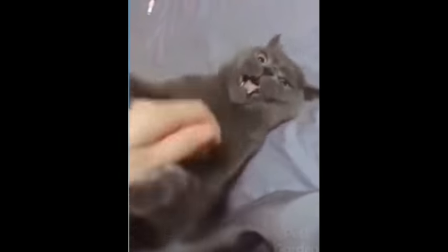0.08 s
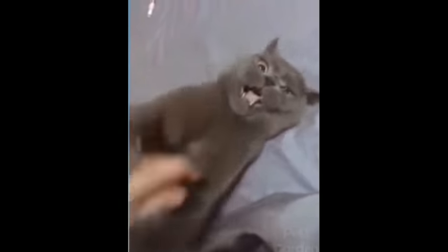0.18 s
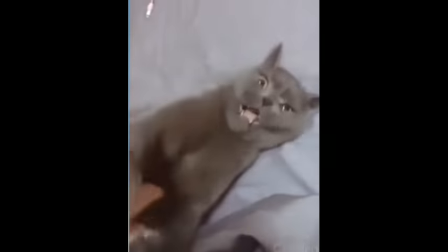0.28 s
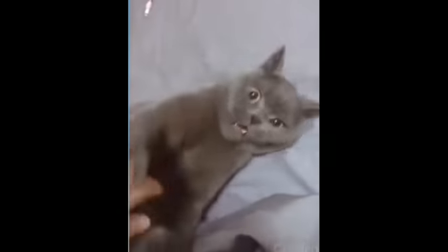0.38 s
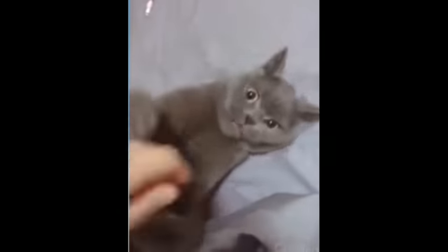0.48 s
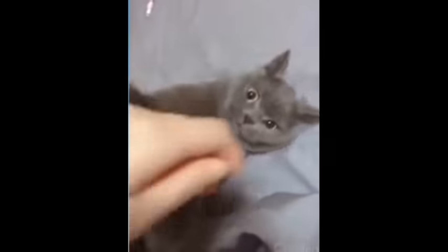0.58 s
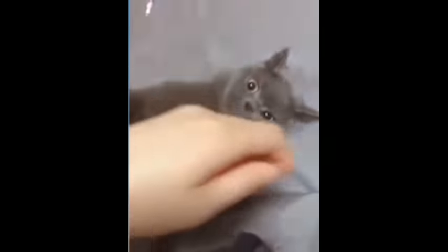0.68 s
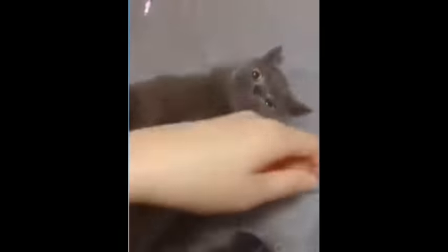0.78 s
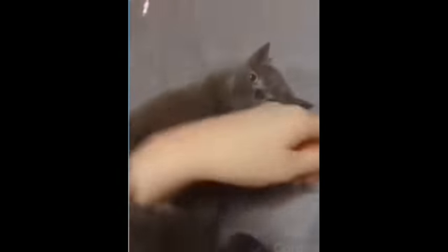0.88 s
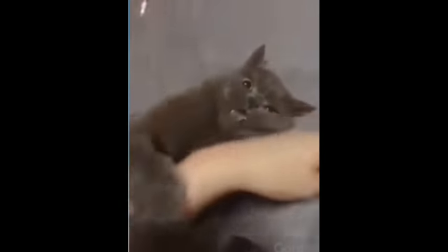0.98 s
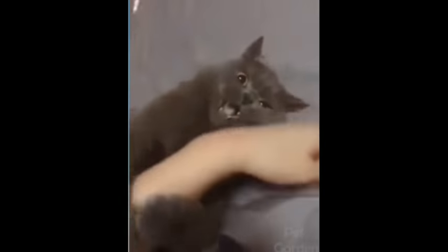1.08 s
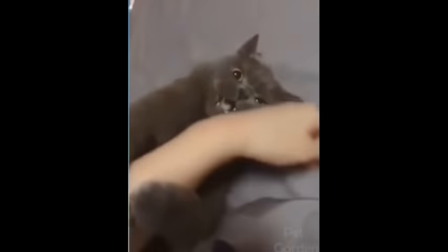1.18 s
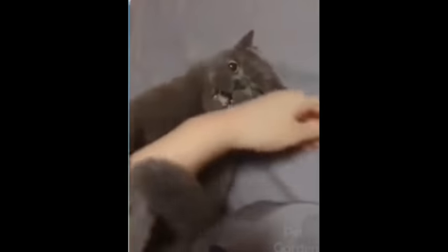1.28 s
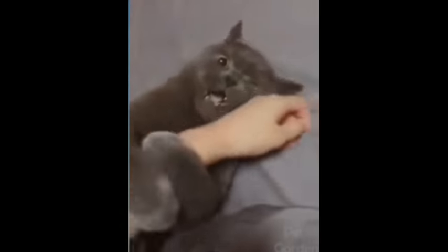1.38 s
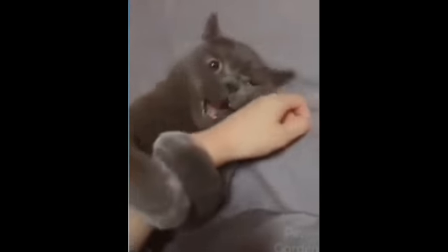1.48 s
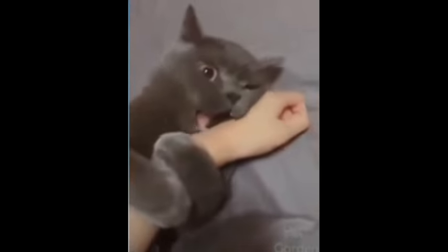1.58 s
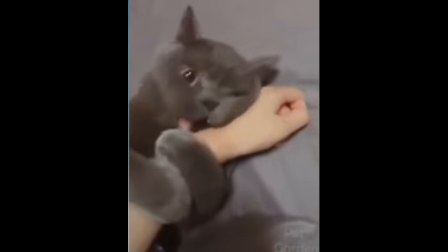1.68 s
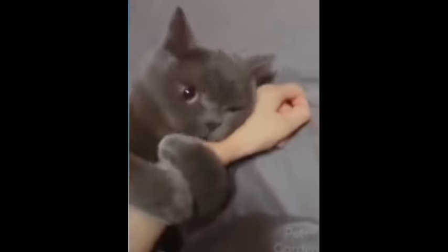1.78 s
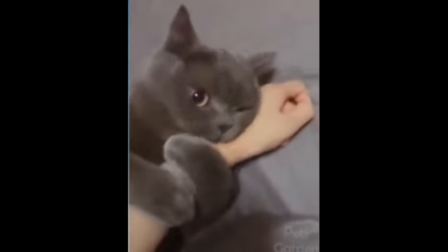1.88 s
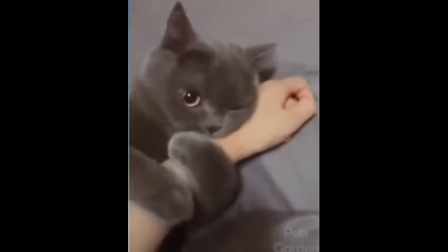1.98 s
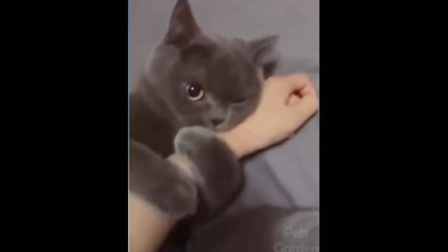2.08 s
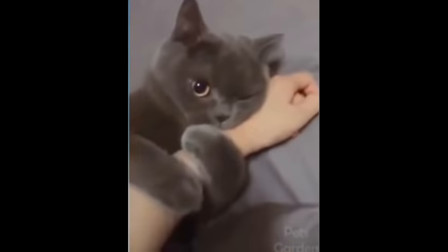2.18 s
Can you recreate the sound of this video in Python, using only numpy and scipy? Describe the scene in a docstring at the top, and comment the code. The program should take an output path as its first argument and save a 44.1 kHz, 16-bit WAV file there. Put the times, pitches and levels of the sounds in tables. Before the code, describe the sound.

A cat yowls close to the microphone in a small room: two sharp rising yelps, a sinking closed-mouth moan, then a rasping meow that stops. Soft bedding rustles and a faint low hum lie underneath.

```python
"""One long complaining yowl, close to the microphone: a cat wrestling with an arm on a bed.
It rises to two sharp yelps, sinks to a closed-mouth moan, then opens again in a rasping meow.
The voice is a stack of harmonics plus pulsed noise, shaped by moving throat, mouth and nose resonances.
Bedding rustles in swells of coloured noise; a small room answers with reflections and a short tail.
Underneath, a few wavering sines hum over steady noise."""
import sys
import numpy as np
from scipy import signal
from scipy.fft import rfft, irfft, next_fast_len
from scipy.io import wavfile
from scipy.ndimage import uniform_filter1d, map_coordinates

SR = 44100
rng = np.random.default_rng(int(sys.argv[2]) if len(sys.argv) > 2 else 0)


def to_wav(s):
    """Save 16-bit WAV."""
    ch = np.atleast_2d(s).T  # columns
    pcm = np.round(np.clip(ch, -1, 1) * 32767)  # PCM
    wavfile.write(sys.argv[1], SR, pcm.astype(np.int16))


N = 97020
TOP_HZ = 14000  # upper band limit of the voice's harmonics and of the recorder


def amp(db):
    """Amplitude factor of a level in dB."""
    return 10 ** (np.asarray(db) / 20)


def unit(x):
    """x scaled to rms 1."""
    return x / np.sqrt(np.mean(x ** 2) + 1e-20)


def along(points, hz):
    """Spectral shape from (Hz, value) points, read on a log frequency axis."""
    f, v = np.transpose(points)
    return np.interp(np.log(hz + 1), np.log(f + 1), v)


def curve(rows, t):
    """Each column after the time, read at the times t."""
    s, *cols = np.transpose(rows)
    return np.squeeze([np.interp(t, s, c) for c in cols])


def wobble(rate, t):
    """A smooth random curve, rate knots a second."""
    return map_coordinates(rng.standard_normal(4096), [t * rate], mode="wrap")


def filtered(x, response):
    """x shaped by a gain that depends on frequency."""
    m = next_fast_len(N + 8192)
    freqs = np.fft.rfftfreq(m, 1 / SR)
    return irfft(rfft(x, m) * response(freqs), m)[:N]


def noise(spectrum):
    """Coloured noise of rms 1."""
    return unit(filtered(rng.standard_normal(N), lambda hz: amp(along(spectrum, hz))))


def cat(count=30):
    """Vocal folds with slight jitter, and turbulence pulsed once a cycle, through the same resonances."""
    # pitch of the voice: t/s, f/Hz
    pitch_line = [(0, 627.4), (.05, 648), (.104, 667), (.15, 608.7), (.18, 632), (.203, 698), (.222, 707),
                  (.236, 662.4), (.264, 652.4), (.298, 681), (.34, 698), (.368, 713), (.413, 702.7),
                  (.44, 733.1), (.478, 776), (.545, 768), (.6, 706), (.662, 640.6), (.728, 562.5),
                  (.804, 530), (.852, 447.2), (.894, 418.4), (.942, 391.7), (.984, 375.3), (1.04, 368.4),
                  (1.085, 373.2), (1.12, 397.6), (1.16, 383.4), (1.205, 391), (1.23, 428.1), (1.25, 458.1),
                  (1.278, 484), (1.306, 530), (1.334, 640.7), (1.35, 618.4), (1.382, 592.7), (1.458, 581),
                  (1.51, 611), (1.556, 644.3), (1.6, 598), (1.656, 504.5), (1.672, 510), (1.7, 603.5)]
    # roughness, drives both jitter and rasp: t/s, amount/0-1
    roughness = [(0, .1), (.23, .04), (.29, .015), (.32, .02), (.345, .16), (.385, .06), (.415, .015),
                 (.455, .08), (.49, .035), (.56, .03), (.68, .05), (.85, .08), (.93, .15), (1.18, .13),
                 (1.26, .13), (1.295, .2), (1.315, .28), (1.328, .42), (1.345, .15), (1.45, .07),
                 (1.57, .07), (1.66, .2)]
    # drive of the nasal tone, added to the nose shape: t/s, drive/dB
    nasal_drive = [(0, -9.5), (.21, -9.5), (.25, 4), (.31, 0), (.35, -17), (.42, 2), (.55, 5), (.66, -12.5),
                   (.73, 2), (.8, 0.5), (.87, -3), (1, -8), (1.2, -7), (1.26, -16), (1.31, -13),
                   (1.35, -6.5), (1.4, -14), (1.61, -12.5), (1.63, -3.5), (1.678, -9), (1.7, -60)]
    # nose resonance before the drive: f/Hz, level/dB
    nose_shape = [(300, -14), (380, -26), (440, -27), (530, -37), (600, -40.5), (680, -43), (790, -52.5),
                  (1000, -36.5), (2000, -100)]
    base_jitter, flutter_db, rasp_db = 0.004, 1.3, 4  # roughness scales jitter and rasp
    quiver_s, quiver_length_s, quiver_rate_hz, quiver_depth = 1.04, .16, 42, .018  # during the moan
    wander_rad_per_harmonic, wander_rate = .075, 70  # rate in knots a second
    hop = 64  # samples between frames

    t = np.arange(N) / SR
    hz, frames, z = signal.stft(rng.standard_normal(N), SR, nperseg=8 * hop, noverlap=7 * hop)
    rough = np.clip(curve(roughness, t), 0, 1)

    quiver_swell = np.exp(-((t - quiver_s) / quiver_length_s) ** 4)
    quiver = quiver_swell * np.sin(2 * np.pi * quiver_rate_hz * t + wobble(20, t))
    jitter = base_jitter * (.5 + 7 * rough) * wobble(170, t)
    pitch = curve(pitch_line, t) * (1 + jitter + quiver_depth * quiver)
    phase = 2 * np.pi * np.cumsum(pitch) / SR

    f0 = curve(pitch_line, frames)
    harmonics = np.arange(1, count + 1)[:, None] * f0
    nose = amp(along(nose_shape, harmonics) + curve(nasal_drive, frames))
    gains = np.hypot(tract(harmonics, frames, harmonics), nose)
    shifts = uniform_filter1d(resonance_phase(gains), size=15, axis=1)
    # higher harmonics drift further out of step
    shifts = shifts + [k * wander_rad_per_harmonic * wobble(wander_rate, frames) for k in range(count)]

    tone = np.zeros(N)
    audible = gains * (harmonics < TOP_HZ)
    for k, (gain, shift) in enumerate(zip(audible, shifts), 1):
        level = np.interp(t, frames, gain * amp(flutter_db * wobble(60.35, frames)))
        tone += level * np.cos(k * phase + np.interp(t, frames, shift))

    # each harmonic's level spreads over a band one f0 wide
    turbulence = z * tract(hz[:, None], frames, harmonics) * np.sqrt(SR / 2 / f0)
    rasp = signal.istft(turbulence, nperseg=8 * hop, noverlap=7 * hop)[1][:N]
    pulses = unit(1 + .8 * np.cos(phase))
    voice = np.sqrt(2) * tone + amp(rasp_db) * rough * rasp * pulses
    return voice * np.clip((pitch_line[-1][0] - t) / .02 + 1, 0, 1)  # 20 ms fade at the end


def tract(hz, t, harmonics):
    """Gain of throat, mouth and upper resonance; each shares its level among the harmonics in it."""
    # throat resonance, before the notch: t/s, level/dB
    throat_level = [(0, -54), (.022, -43.5), (.11, -40.5), (.16, -31), (.21, -42.5), (.24, -27),
                    (.275, -31.5), (.35, -43.5), (.42, -32), (.52, -40), (.66, -39), (.8, -50), (.87, -45),
                    (.93, -38.5), (1.05, -36.5), (1.17, -44), (1.24, -40.5), (1.3, -35), (1.45, -34),
                    (1.56, -32), (1.66, -44.5), (1.685, -44), (1.71, -78)]
    # open mouth, before the notch: t/s, level/dB
    mouth_level = [(0, -49), (.13, -63), (.155, -34.5), (.2, -51), (.23, -37), (.252, -26.5), (.268, -17.5),
                   (.283, -15.5), (.298, -16.5), (.313, -20), (.335, -33.5), (.388, -33.5), (.402, -16),
                   (.43, -15), (.46, -23), (.55, -26), (.66, -34.5), (.7, -47.5), (.77, -58.5),
                   (.83, -48.5), (.92, -44.5), (1, -49.5), (1.205, -48), (1.23, -34.5), (1.246, -37),
                   (1.265, -23), (1.355, -24), (1.4, -31), (1.45, -42.5), (1.5, -42), (1.555, -26.5),
                   (1.61, -42.5), (1.66, -61), (1.71, -56)]
    # upper resonance, before the notch: t/s, level/dB, centre f/Hz, half-width/Hz
    treble = [(0, -71, 5300, 900), (.13, -65.5, 5460, 700), (.156, -44.5, 5730, 480),
              (.19, -58.5, 5720, 450), (.225, -50.5, 5980, 455), (.245, -39.5, 3840, 1000),
              (.285, -30.5, 3700, 850), (.34, -58, 4520, 800), (.385, -58, 4170, 1000),
              (.41, -32, 4000, 1000), (.435, -22.5, 3950, 1040), (.472, -23.5, 4200, 1000),
              (.51, -36.5, 4940, 1012), (.56, -34.5, 5160, 800), (.595, -38.5, 5370, 480),
              (.635, -38, 5480, 332), (.668, -41.5, 5540, 380), (.692, -54, 5560, 300),
              (.71, -89, 5400, 600), (.82, -91, 3600, 400), (.92, -61, 3436, 347.2), (1.07, -62, 3431, 350),
              (1.2, -76, 3700, 600), (1.25, -54.5, 4270, 890), (1.305, -33, 4380, 850),
              (1.35, -35.5, 4832, 550), (1.39, -49, 4520, 551), (1.44, -62, 4598, 800),
              (1.51, -70, 4400, 800.6), (1.555, -55, 4410, 450.3), (1.62, -80, 4400, 900),
              (1.71, -87, 4400, 900)]
    # sharp resonance in the mouth, negative lift dips: t/s, lift/dB, centre f/Hz
    sharp_focus = [(0, 4, 1950), (.16, -1.5, 1850), (.21, -5, 2100), (.25, 5.5, 2020), (.29, 9, 2020),
                   (.35, -4.5, 2050), (.42, 14, 2040), (.5, 4.5, 2270), (.56, 0, 2233), (.66, 3, 1990),
                   (1.05, 10, 1850), (1.23, 18.5, 2170), (1.28, -1, 2410), (1.31, 7, 2120),
                   (1.35, -3.5, 2008), (1.45, -5, 1870), (1.55, 9.5, 1900), (1.65, 16, 1907)]
    # moving anti-resonance, above the upper resonance in the yelps, mostly below it elsewhere;
    # negative depth lifts: t/s, f/Hz, depth/dB
    notch_path = [(0, 4400, -2), (.16, 4720, 0.5), (.245, 4500, 24), (.28, 4970, 26), (.32, 5400, 6),
                  (.375, 4384, 10), (.41, 4200, 10), (.437, 4320, 19), (.47, 4030, 7), (.51, 3700, 0),
                  (.56, 3487, -4), (.63, 3400, 8), (.67, 3170, 9), (.8, 3300, -3), (1.25, 3503, 3),
                  (1.3, 3500, -4), (1.35, 3546, 3), (1.39, 3560, 23), (1.55, 3520, 28), (1.7, 3337, 6)]
    # relative colour of throat, mouth and top end: f/Hz, level/dB
    throat_shape = [(400, -49), (750, -28), (900, -15.5), (1170, -3.5), (1500, -10.5), (1750, -12.5),
                    (2200, -42), (4000, -54.5)]
    mouth_shape = [(600, -56), (1400, -14.5), (1800, 3), (2350, 1), (2900, 3.5), (3150, 0.5), (3450, -19),
                   (4200, -21.5), (5000, -33), (6000, -32.5), (7600, -61), (9200, -49.5), (10700, -73),
                   (12000, -52), (14000, -53)]
    top_shape = [(3000, 1), (6200, -4), (7000, 2.5), (7700, -13), (8400, -1), (9200, 1), (10000, -1.5),
                 (10700, -29.5), (11500, -15), (12300, -2), (14000, -20.5)]
    focus_width_hz, notch_width_hz = 210, 188
    skirt_db = -35.5  # floor around the upper resonance

    treble_db, centre, width = curve(treble, t)
    lift_db, focus = curve(sharp_focus, t)

    def throat(f):
        return amp(along(throat_shape, f))

    def mouth(f):
        bump = np.exp(-((f - focus) / focus_width_hz) ** 2 / 2)
        return amp(along(mouth_shape, f) + lift_db * bump)

    def upper(f):
        peak = 1 / (1 + ((f - centre) / width) ** 4)
        return amp(along(top_shape, f)) * (peak + amp(skirt_db))

    parts = [(throat, curve(throat_level, t)), (mouth, curve(mouth_level, t)), (upper, treble_db)]
    power = sum((amp(db) * shape(hz)) ** 2 / np.sum(shape(harmonics) ** 2, axis=0) for shape, db in parts)
    notch_hz, depth_db = curve(notch_path, t)
    notch = amp(-depth_db * np.exp(-((hz - notch_hz) / notch_width_hz) ** 2 / 2))
    return notch * np.sqrt(power)


def resonance_phase(gains):
    """Phase of each harmonic that makes the resonances ring after each pulse."""
    log_gain = np.log(np.vstack([gains[:1], gains]) + 1e-4)
    mirrored = np.vstack([log_gain, log_gain[-2:0:-1]])
    return -signal.hilbert(mirrored, axis=0).imag[1:len(log_gain)]  # minimum phase


def bedding():
    """Soft swells of cloth and fur, a few duller scuffs and one small tick."""
    # swells of bedding, then short scuffs, before the grain: centre t/s, length (sigma)/s, level/dB
    rustles = [(0, .05, -49), (.9, 0.28, -57), (1.21, 0.017, -50), (1.6, 0.1, -54), (1.89, .04, -53)]
    scuffs = [(2.065, 0.027, -53), (2.12, 0.016, -57), (2.155, 0.0055, -50)]
    # relative colour of cloth, scuffs and tick: f/Hz, level/dB
    cloth = [(300, 11.5), (1200, 2.5), (2500, 5.5), (4000, -3), (7000, -9), (11000, -13), (14000, -14)]
    scuff_shape = [(300, -6), (1200, 2), (2900, 10), (3600, -13), (4500, -3), (7000, -46), (14000, -38)]
    tick_shape = [(500, -21), (3000, 5), (6000, -7), (14000, -21.5)]
    tick_s, tick_db, tick_decay_s = 1.0775, -44, .002
    grain_db, grain_rate = 2.2, 250  # rate in knots a second
    t = np.arange(N) / SR

    def swells(rows):
        return sum(amp(db) * np.exp(-((t - s) / length) ** 2 / 2) for s, length, db in rows)

    rubbing = swells(rustles) * noise(cloth) + swells(scuffs) * noise(scuff_shape)
    tick_decay = (t > tick_s) * np.exp(-abs(t - tick_s) / tick_decay_s)
    tick = amp(tick_db) * tick_decay * noise(tick_shape)
    return rubbing * amp(grain_db * wobble(grain_rate, t)) + tick


def hum():
    """Low sines whose phases waver, over the room's steady coloured noise."""
    # lines of the hum: f/Hz, rms level/dB
    hum_lines = [(21.5, -35.5), (43, -47), (161, -56.5), (242, -58)]
    # relative colour of the room noise: f/Hz, level per Hz/dB
    air_shape = [(10, -15), (30, 4), (75, 2.5), (125, -12.5), (220, -8.5), (320, -11.5), (420, -18),
                 (800, -21), (1200, -18), (1600, -24.5), (2500, -30.5), (4000, -40.5), (7000, -45),
                 (14000, -52.5)]
    air_db = -37.5  # rms
    t = np.arange(N) / SR
    lines = np.zeros(N)
    for hz, db in hum_lines:
        cycles = hz * t + rng.random()
        lines += amp(db) * np.sin(2 * np.pi * cycles + 0.2 * wobble(7.45, t))
    return np.sqrt(2) * lines + amp(air_db) * noise(air_shape)


def room(x, count=8):
    """A few near reflections at random delays and a short soft tail of decaying noise."""
    t60_s, tail_db, walls_db = .15, -12.5, -11.5
    t = np.arange(SR // 3) / SR
    tail = rng.standard_normal(len(t)) * amp(-60 * t / t60_s) * (1 - np.exp(-t / 0.0084))
    delays = (rng.uniform(0.0021, .018, count) * SR).astype(int)
    walls = np.bincount(delays, rng.choice([-1, 1], count), len(t))
    answer = amp(tail_db) * tail / np.linalg.norm(tail) + amp(walls_db) * walls / np.sqrt(count)
    return x + signal.fftconvolve(x, answer)[:N]


def scene():
    """Cat and bedding sound in the room; the hum and room noise are added without reflections."""
    return (room(cat() + bedding()) + hum())[None]


def record(dry):
    """The recorder keeps nothing above its band limit."""
    return np.array([filtered(ch, lambda hz: hz < TOP_HZ) for ch in dry])


dry = scene()
out = record(dry)
to_wav(out)
```